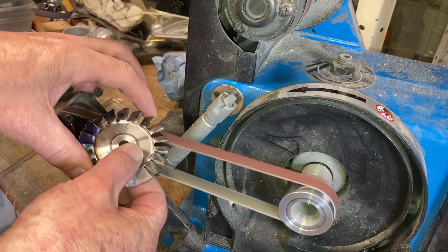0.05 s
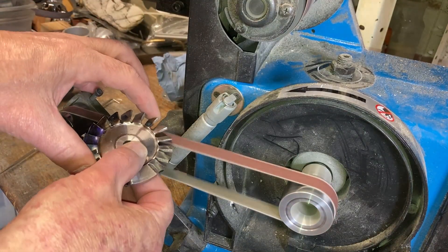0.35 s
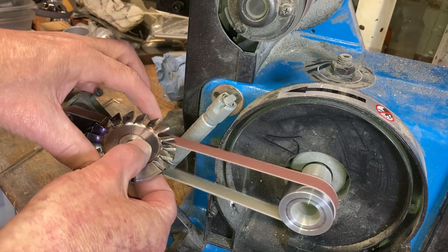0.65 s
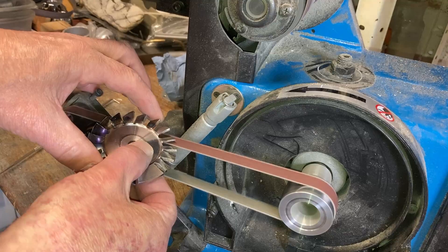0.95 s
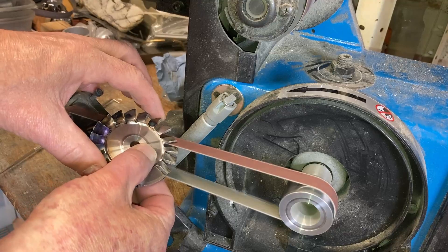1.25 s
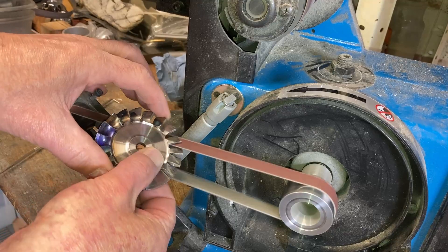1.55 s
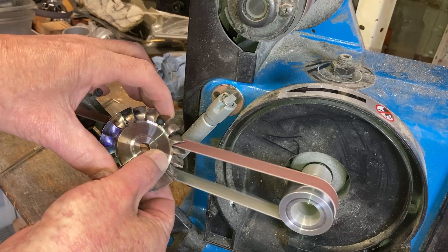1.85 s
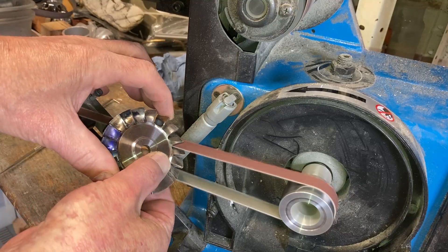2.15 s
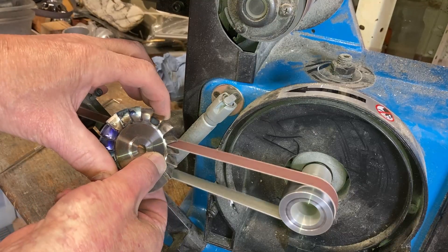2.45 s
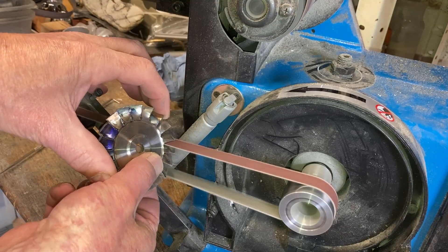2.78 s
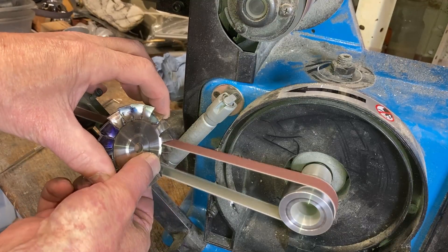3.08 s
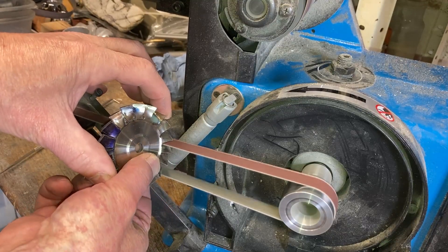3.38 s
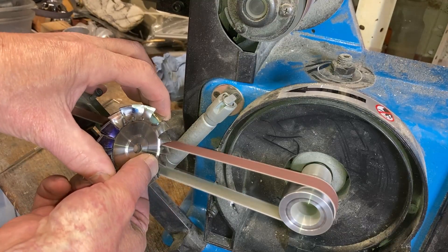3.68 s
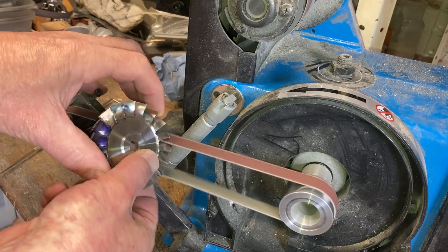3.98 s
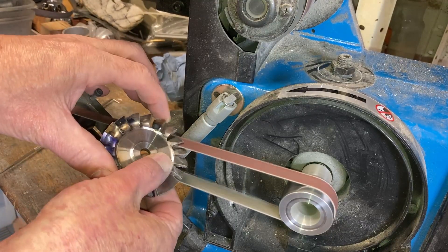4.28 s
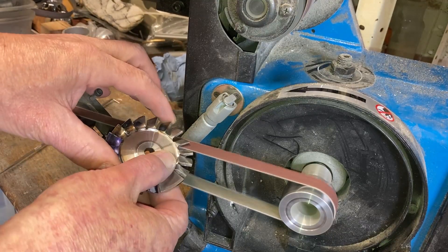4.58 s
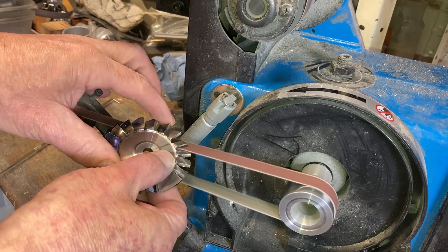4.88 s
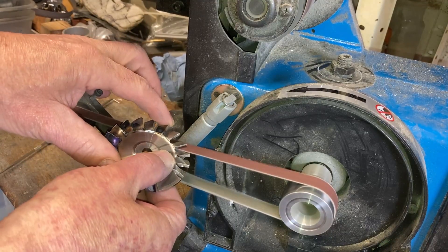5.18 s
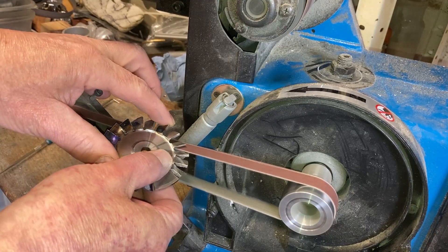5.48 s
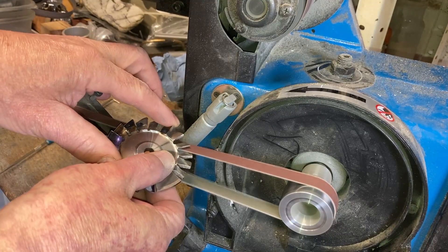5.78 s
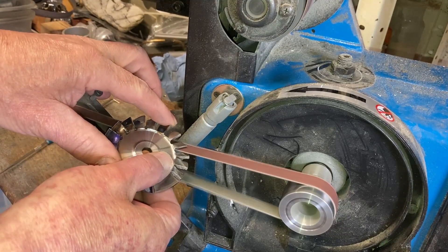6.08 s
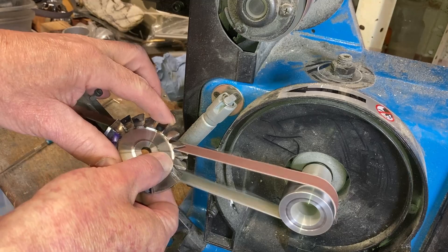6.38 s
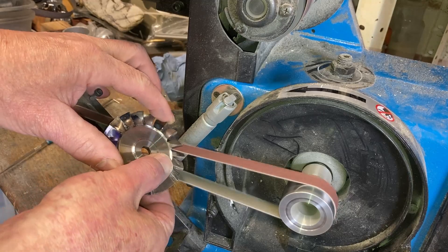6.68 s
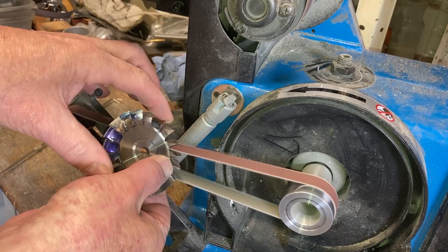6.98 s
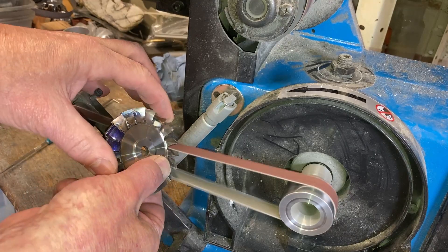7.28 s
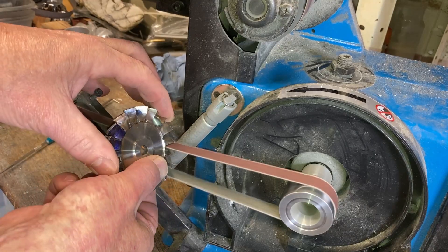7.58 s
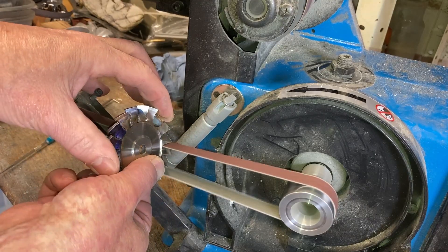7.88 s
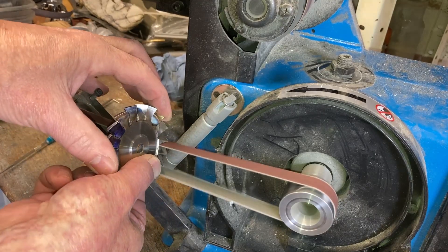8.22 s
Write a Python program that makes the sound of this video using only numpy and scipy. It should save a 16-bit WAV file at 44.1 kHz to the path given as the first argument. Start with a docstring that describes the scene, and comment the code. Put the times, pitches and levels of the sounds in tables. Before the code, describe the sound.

A belt sander hums and rumbles steadily while a steel gear is pressed against it twice, grinding with a thin, ringing hiss.

```python
"""A steel gear hisses and rings thinly as it is pressed twice against a bench belt sander.
Grains on the narrow sanding belt strike the steel, and the hiss changes colour each time
the gear is rolled from its face to its edge. Behind it the sander runs steadily: the motor hums
and the drive belt drums on the pulleys, booming in the sheet-metal frame.
It is heard from close by in a small workshop, in mono."""
import sys
import numpy as np
from scipy import signal
from scipy.fft import rfft, irfft, next_fast_len
from scipy.io import wavfile
from scipy.ndimage import map_coordinates

SR = 44100
rng = np.random.default_rng(int(sys.argv[2]) if len(sys.argv) > 2 else 0)


def digitize_waveform(pressure):
    """Quantize a signal to 16-bit integers and store it at the path in sys.argv[1].

    Rows of a 2-D input are taken as channels; values are limited to [-1, 1].
    """
    field = np.atleast_2d(pressure).T
    bounded = np.clip(field, -1, 1)
    quanta = np.round(bounded * 32767).astype(np.int16)
    wavfile.write(sys.argv[1], SR, quanta)


N = 363825
TIME = np.arange(N) / SR


def from_db(db):
    return 10 ** (np.asarray(db) / 20)


def rms_one(x):
    """Scale a sound to an average strength (rms) of 1."""
    return x / np.sqrt(np.mean(x ** 2) + 1e-20)


def in_time(rows):
    """Join a table's rows with straight lines: one curve for each column after the time."""
    times, *columns = np.transpose(rows)
    return [np.interp(TIME, times, column) for column in columns]


def drift(per_s):
    """A random wander, about 1 in size, that takes a new direction per_s times a second."""
    points = rng.standard_normal(2000)
    return np.interp(TIME * per_s, np.arange(len(points)), points)


def colour(x, spectrum):
    """Shape a sound by (frequency [Hz], level [dB]) rows, fading beyond both ends; rms 1."""
    hz, db = np.transpose(spectrum)
    size = next_fast_len(N + 4096)
    freqs = np.maximum(np.arange(size // 2 + 1) * SR / size, 1)
    ends = np.minimum(freqs / hz[0], 1) ** 2 * np.minimum(hz[-1] / freqs, 1) ** 2
    gain = from_db(np.interp(np.log(freqs), np.log(hz), db))
    return rms_one(irfft(rfft(x, size) * ends * gain, size)[:N])


def resonate(x, notes):
    """Make a sound ring at each (pitch [Hz], width [Hz], level [dB]); narrow rings longer; rms 1."""
    out = 0
    for k, (hz, width, db) in enumerate(notes):
        decay = np.exp(-np.pi * abs(width) / SR)
        poles = [1, -2 * decay * np.cos(2 * np.pi * hz / SR), decay ** 2]
        ringing = (1 - decay ** 2) / 2 * signal.lfilter([1, 0, -1], poles, x)
        out = out + (-1) ** k * from_db(db) * ringing
    return rms_one(out)


def belt_surface(laps, repeat):
    """A share (repeat) of a belt's roughness comes round on every lap; the rest is fresh noise."""
    size = int(SR * TIME[-1] / laps[-1])
    one_lap = irfft(np.exp(2j * np.pi * rng.random(8192))[:size // 2 + 1], size)
    looped = rms_one(map_coordinates(one_lap, [laps % 1 * size], order=1, mode="grid-wrap"))
    return np.sqrt(repeat) * looped + np.sqrt(1 - repeat) * rng.standard_normal(N)


def passing(laps, place, width):
    """A smooth swell each time one spot of a belt comes round."""
    distance = (laps - place + .5) % 1 - .5
    return np.exp(-.5 * (distance / width) ** 2)


def motor_hum(mains_hz=100, beat_hz=.935, mains_db=-60, motor_db=-70):
    """The mains hum and a weaker motor tone just below it throb together about once a second."""
    mains = from_db(mains_db) * np.sin(2 * np.pi * mains_hz * TIME)
    motor = from_db(motor_db) * np.sin(2 * np.pi * (mains_hz - beat_hz) * TIME)
    return np.sqrt(2) * (mains + motor)


# rumble of belts and bearings: (frequency [Hz], relative level [dB])
RUMBLE_SPECTRUM = [(30, -31), (70, -24), (125, -15.5), (165, -19.5), (205, -8.5), (350, -10), (520, -3),
                   (700, 0.5), (850, -2.5), (1130, -2.5), (1300, -12.5), (1650, -3.5), (1900, -6.5),
                   (2400, -21)]
# rush of the free-running belt: (frequency [Hz], relative level [dB])
RUSH_SPECTRUM = [(1500, -4), (2000, 0), (2450, -13.5), (3000, -2.5), (3900, -13.5), (4800, -10),
                 (6400, -4.5), (8400, -12.5), (11000, -9.5), (13000, -14), (15500, -25)]
# ringing of the pulleys and belt arm: (pitch [Hz], width [Hz], relative level [dB])
ARM_NOTES = [(2695, 42, 4.5), (3183, 58, 6.5), (3846, 320, 3.5), (4670, 130, -4.5)]


def long_belt(lap_hz=8.542, rumble_db=-42, rush_db=-50, arm_db=-52):
    """A long belt rumbles over its rollers; air and grit rush along the arm."""
    laps = lap_hz * TIME + .00036 * drift(2)
    rumble = from_db(rumble_db) * colour(belt_surface(laps, repeat=.72), RUMBLE_SPECTRUM)
    rush = from_db(rush_db) * colour(belt_surface(laps, repeat=.1), RUSH_SPECTRUM)
    arm = from_db(arm_db) * resonate(belt_surface(laps, repeat=.37), ARM_NOTES)
    return rumble + rush + arm


# stiff spots of the drive belt, its joint first: (place [laps], width [laps], strength [dB])
STIFF_SPOTS = [(.06, .05, 0), (.27, .04, .5), (.49, .04, 0), (.77, .035, -1), (.94, .035, -2)]
JOINT_PLACE = STIFF_SPOTS[0][0]
# ringing of the metal frame: (pitch [Hz], width [Hz], relative level [dB])
FRAME_NOTES = [(505, 28, -5.5), (627, 33, -5.5), (807.6, 46, 1.5), (861.5, 42, 1.5), (992, 15, -9)]
# ringing that only the joint sets off: (pitch [Hz], width [Hz], relative level [dB])
JOINT_NOTES = [(1621, 54, 7), (1670, 37, -13), (1883, 23, -2)]


def drive_belt(laps, frame_db=-44, joint_db=-51):
    """Stiff spots hit a pulley and drum on the frame; the joint adds a brighter slap once a lap."""
    bumps = sum(from_db(db) * passing(laps, place, width) for place, width, db in STIFF_SPOTS)
    push = .3 + bumps  # between the bumps the belt still rubs
    frame = resonate(push * belt_surface(laps, repeat=.15), FRAME_NOTES)
    slap = passing(laps, JOINT_PLACE, width=.06)
    joint = resonate(slap * belt_surface(laps, repeat=.55), JOINT_NOTES)
    knocks = from_db(frame_db) * frame + from_db(joint_db) * joint
    return signal.sosfilt(signal.butter(2, [350, 2300], "band", fs=SR, output="sos"), knocks)


# notes of small fast rollers: (pitch [Hz], level [dB])
ROLLER_TONES = [(226, -64), (967.3, -54.5), (1136, -65), (1879, -65)]
# tones of the shaft and drive belt: (pitch [cycles per lap of the drive belt], level [dB])
SHAFT_TONES = [(5, -75), (30, -63.5), (40, -62), (45, -58), (50, -48.5), (55, -53.5), (70, -58), (75, -60),
               (76, -54), (80, -42), (81, -56), (82, -57), (84, -48.7), (85, -49), (86, -51.5), (92, -58),
               (93, -58), (97, -57), (160, -58)]


def whine(laps):
    """The spinning rollers, shaft and drive belt each add their own steady tones."""
    out = sum(from_db(db) * np.sin(2 * np.pi * hz * TIME + .5 * drift(3)) for hz, db in ROLLER_TONES)
    # the belt stretches a little, so all its tones flutter together
    turned = laps - JOINT_PLACE + .0003 * drift(12)
    for cycles, db in SHAFT_TONES:
        # tones near the frame's ring (84 cycles a lap) peak together in a throb; the rest spread out
        smear = .1 * (cycles - 84) ** 2 + rng.normal(0, .3)
        out = out + from_db(db) * np.sin(2 * np.pi * cycles * turned + smear)
    return np.sqrt(2) * out


# how loud the sander is heard: (time [s], overall level [dB], boom level [dB])
SANDER_LEVELS = [(0.05, -34.5, -5.5), (0.61, -36.5, -8), (2.79, -40, -8), (5.04, -37.5, -8),
                 (5.08, -38, -8), (6.09, -36.5, -9.5), (6.73, -39.5, -11.5), (8.05, -39.5, -8)]
USUAL_SANDER_DB, USUAL_BOOM_DB = -38, -7.5  # at these levels the sound is left unchanged


def sander(shaft_hz=49.648, slowing_hz_per_s=.0087, turns_per_lap=5):
    """Motor and belts run together, their sound slowly swelling and fading; the shaft slows very slightly."""
    laps = np.cumsum(shaft_hz - slowing_hz_per_s * TIME) / SR / turns_per_lap
    level_db, boom_db = in_time(SANDER_LEVELS)
    swing_db = level_db - USUAL_SANDER_DB
    moving_parts = from_db(swing_db) * (whine(laps) + drive_belt(laps) + long_belt())
    low_band = signal.sosfilt(signal.butter(1, [380, 580], "band", fs=SR, output="sos"), moving_parts)
    boom_change = (from_db(boom_db - USUAL_BOOM_DB) - 1) * low_band
    hum = from_db(.6 * swing_db) * motor_hum()  # the hum swings less than the rest
    return moving_parts + boom_change + hum


def bench_echoes(x, echo_db, count=12):
    """Short echoes off the machine and the bench boost some pitches and weaken others."""
    out = x.copy()
    for delay_s, sign in zip(rng.uniform(.001, .012, count), rng.choice([-1, 1], count)):
        lag = int(delay_s * SR) + 1
        out[lag:] += sign * from_db(echo_db) / np.sqrt(count) * x[:-lag]
    return out / np.sqrt(1 + from_db(echo_db) ** 2)


# echoes off the two hands: (delay on the gear's face [s], delay on its edge [s], strength [factor])
HAND_ECHOES = [(.0011, .0014, .17), (.0023, .002, -.15)]


def hand_echoes(x, roll):
    """The hands move as the gear rolls, so their echoes sweep ripples through the hiss."""
    out = x
    for face_s, edge_s, strength in HAND_ECHOES:
        delay_s = (face_s + (edge_s - face_s) * roll) * (1 + .025 * drift(1.2))
        out = out + strength * map_coordinates(x, [np.arange(N) - delay_s * SR], order=3)
    return out


def held(on, off, attack_s, release_s=.07):
    """One contact with the belt: rise from 0 to 1, hold, then fall back."""
    return np.clip((TIME - on) / attack_s, 0, 1) * np.clip(1 - (TIME - off) / release_s, 0, 1)


# the gear only rests on the belt: (start [s], end [s], hiss level [dB], ring level [dB])
LIGHT_TOUCHES = [(0, .58, -47.5, -66), (.18, .23, -49, -51), (3.92, 4.63, -52, -70),
                 (4.3, 4.61, -52.5, -55.5)]
# it is pressed on and rolled: (start [s], end [s], fade-in [s], middle of roll [s], roll length [s])
PRESSES = [(.59, 3.9, 0.023, 2.65, 0.71), (4.6, 8.3, 0.08, 6.98, 1.15)]
# how hard the hands push, one list for each press: (time [s], hiss level [dB], ring level [dB])
PRESS_LEVELS = [
    [(0.62, -47, -46), (0.72, -45, -43.5), (0.97, -43.5, -41.5), (1.38, -43.5, -43.5), (1.59, -41.5, -40),
     (1.83, -45, -46.5), (2.87, -38.5, -45), (3.8, -39, -42), (3.9, -41, -42)],
    [(4.72, -45, -46), (4.81, -41, -45), (5.98, -41.5, -57), (6.29, -43.5, -56), (6.58, -39.5, -47),
     (6.76, -42.5, -49.5), (6.93, -40, -47), (7.91, -36, -43), (8.25, -37.5, -42)],
]


def handling(start_roll=.1, end_roll=.94):
    """The hands set the strength of hiss and ring, and the roll: 0 = on its face, 1 = on its edge."""
    hiss_power, ring_power, rolled = 1e-12, 1e-12, 0
    for on, off, hiss_db, ring_db in LIGHT_TOUCHES:
        contact = held(on, off, attack_s=.011)
        hiss_power += (contact * from_db(hiss_db)) ** 2
        ring_power += (contact * from_db(ring_db)) ** 2
    for (on, off, attack_s, roll_at, roll_s), levels in zip(PRESSES, PRESS_LEVELS):
        contact = held(on, off, attack_s)
        hiss_db, ring_db = in_time(levels)
        hiss_power += (contact * from_db(hiss_db)) ** 2
        ring_power += (contact * from_db(ring_db)) ** 2
        rolled += contact * .5 * (1 + np.tanh(2 * (TIME - roll_at) / roll_s))
    roll = np.clip(start_roll + (end_roll - start_roll) * rolled, 0, 1)
    return np.sqrt(hiss_power), np.sqrt(ring_power), roll


def grit(per_s, spread_db):
    """Sanding grains of uneven size strike the steel at random; rms 1."""
    sizes = from_db(spread_db * np.minimum(rng.exponential(1, N), 4))
    strikes = rng.random(N) < per_s / SR
    return rms_one(strikes * sizes * rng.standard_normal(N))


def bite(lap_hz=11.87, uneven_db=.8, tremble_db=-.13):
    """The sanding belt cuts unevenly along its length, and the gear trembles in the fingers."""
    uneven = sum(np.cos(2 * np.pi * (k * lap_hz * TIME + rng.random())) for k in (1, 2, 3, 7))
    return from_db(uneven_db * rms_one(uneven) + tremble_db * drift(130))


# a tooth catches and sings: (loudest moment [s], spread in time [s], pitch [Hz], level [dB])
TOOTH_SONGS = [(1.0, .3, 9650, -54), (1.1, 0.45, 13210, -53.5), (2.6, .3, 5150, -56),
               (5.15, 0.29, 13210, -56), (6.0, .4, 13210, -57), (7.75, 0.43, 5520, -50)]


def singing_teeth(width_hz=70):
    """Thin notes swell and fade as one tooth after another takes the load."""
    scrape = rng.standard_normal(N)
    out = 0
    for peak_at, spread_s, hz, db in TOOTH_SONGS:
        swell = np.exp(-.5 * ((TIME - peak_at) / spread_s) ** 2)
        out = out + from_db(db) * swell * resonate(scrape, [(hz, width_hz, 0)])
    return out


# ringing of the gear in the cupped hand:
# (pitch [Hz], rough width [Hz], relative level on its face [dB], relative level on its edge [dB])
GEAR_NOTES = [(5137, 250, -5.5, -7), (5590, 210, -13, -4.5), (5906, 290, -3.5, -6), (6190, 280, -3, -2.5),
              (6640, 200, -18, -27), (7116, 260, -6.5, 0), (7480, 310, 2.5, -1), (7970, 300, -6, -12),
              (8420, 240, -14, -1), (8590, 290, -3, -14), (9020, 380, -14, 2.5), (9410, 360, -7.5, 0),
              (9780, 360, 1, 0), (10420, 320, 0.5, 0), (11030, 220, -7, 1.5), (11360, 430, -14, -4),
              (11860, 360, -6.5, -4), (12720, 950, -13, -4), (14000, 900, -12, -10), (14700, 600, -18, -5)]


def gear_body(scrape, roll, wander_db=2.7):
    """Each note of the gear swells and fades as it rolls and the contact creeps along a tooth."""
    out = 0
    for hz, width, face_db, edge_db in GEAR_NOTES:
        band_hz = np.clip([hz - abs(width) / 3, hz + abs(width) / 3 + 1], 100, .45 * SR)
        shifted = np.roll(scrape, rng.integers(N))  # so that each note rings on its own
        ringing = signal.sosfilt(signal.butter(2, band_hz, "band", fs=SR, output="sos"), shifted)
        strength = np.sqrt((1 - roll) * from_db(face_db) ** 2 + roll * from_db(edge_db) ** 2)
        wander = 1 + (from_db(wander_db) - 1) * drift(1.53)
        out = out + ringing * strength * wander
    return rms_one(out)


# hiss of the grains on the gear's face: (frequency [Hz], relative level [dB])
FACE_SPECTRUM = [(2500, -3), (4000, -0.5), (6000, 2.5), (7500, 5), (9000, -1.5), (10000, -3), (11500, -11),
                 (13000, -3), (15500, -12.5)]
# hiss of the grains on its edge: (frequency [Hz], relative level [dB])
EDGE_SPECTRUM = [(2500, -10), (4300, -7.5), (5800, 1), (8000, -8.5), (9200, -2.5), (10900, 1), (12000, -16),
                 (14500, -10.5), (15700, -14)]
# ringing of the teeth: (pitch [Hz], width [Hz], relative level [dB])
TOOTH_NOTES = [(10650, 110, -3.5), (10750, 95, -3.5), (10800, 220, -9.5)]
# teeth briefly grazing the belt: (time [s], peak level [dB])
TOOTH_GRAZES = [(.240, -38.5), (.544, -46), (.620, -41), (.642, -45), (.683, -41), (4.193, -50),
                (4.234, -49), (4.444, -49), (4.529, -44), (4.695, -45), (4.722, -41)]


def grinding_gear(face_db=-3, edge_db=-5.5, body_db=.26, ring_db=.5, graze_s=.0065, touch_db=-52):
    """Grains hiss on the steel and ring the teeth; rolling the gear changes the colour."""
    hiss_strength, ring_strength, roll = handling()
    cut = bite()
    grains = grit(per_s=11000, spread_db=2.5)
    face = from_db(face_db) * colour(grains, FACE_SPECTRUM)
    edge = from_db(edge_db) * colour(grains, EDGE_SPECTRUM)
    # a light touch only hisses: it takes pressure to wake the whole gear
    pressure = np.clip((20 * np.log10(hiss_strength) - touch_db) / 10, 0, 1)
    body = from_db(body_db) * pressure * gear_body(grit(per_s=20000, spread_db=1.5), roll)
    hiss = hiss_strength * cut * (np.sqrt(1 - roll) * face + np.sqrt(roll) * edge + body)
    grazes = sum(from_db(db) * (TIME > at - .002) * np.exp(-np.abs(TIME - at) / graze_s)
                 for at, db in TOOTH_GRAZES)
    teeth = resonate(grit(per_s=5500, spread_db=-1.5) * cut, TOOTH_NOTES)
    ring = (from_db(ring_db) * ring_strength + grazes) * teeth
    gear = hand_echoes(hiss, roll) + ring + .5 * grazes * face
    # so small a part gives off no bass
    return signal.sosfilt(signal.butter(2, 2800, "high", fs=SR, output="sos"), gear)


def scene():
    """The running sander and the gear, the same in both channels."""
    background = sander()
    gear = bench_echoes(grinding_gear(), echo_db=-13) + singing_teeth()
    return np.tile(background + gear, (2, 1))


def record(dry, cutoff_hz=15750):
    """The very highest treble is cut off steeply."""
    return signal.sosfilt(signal.ellip(12, .1, 90, cutoff_hz, fs=SR, output="sos"), dry)


dry = scene()
out = record(dry)
digitize_waveform(out)
```